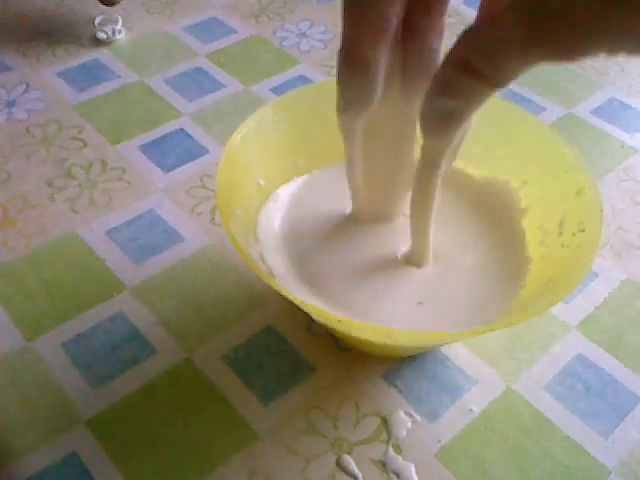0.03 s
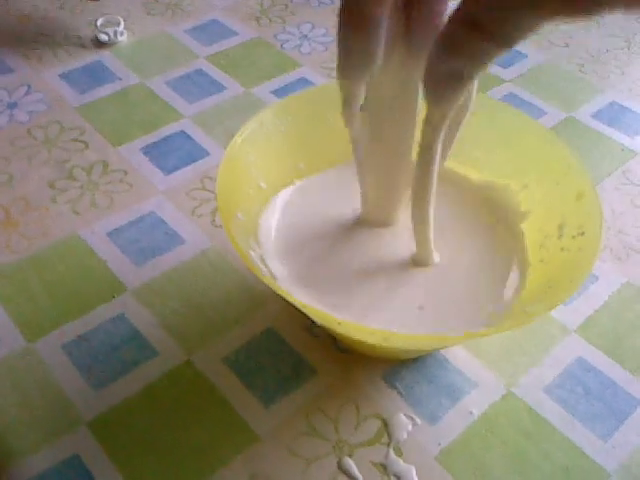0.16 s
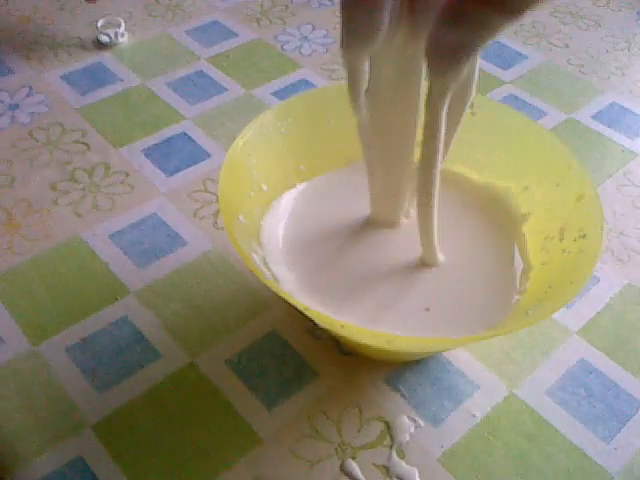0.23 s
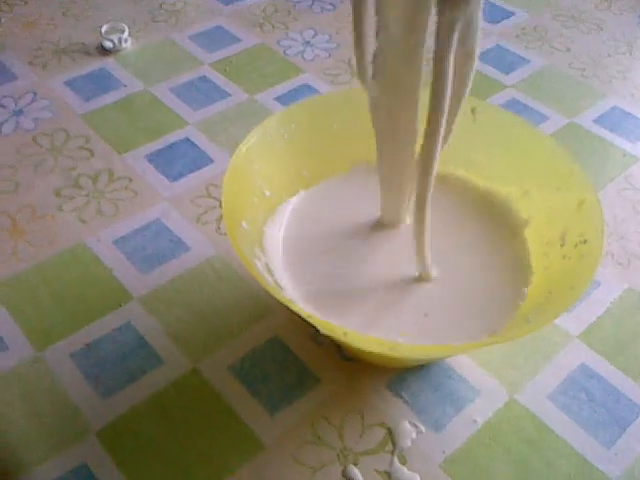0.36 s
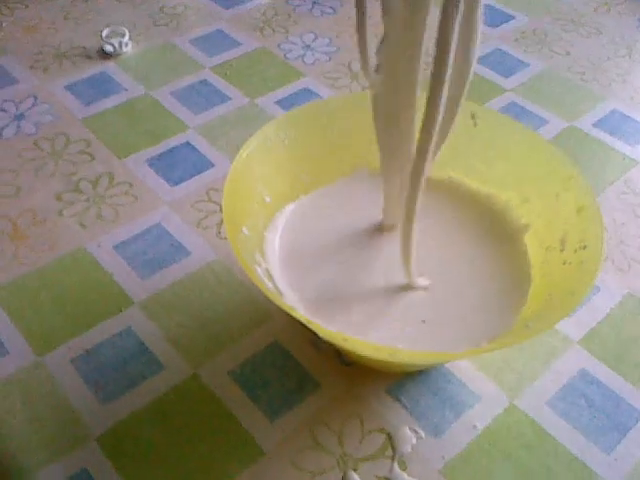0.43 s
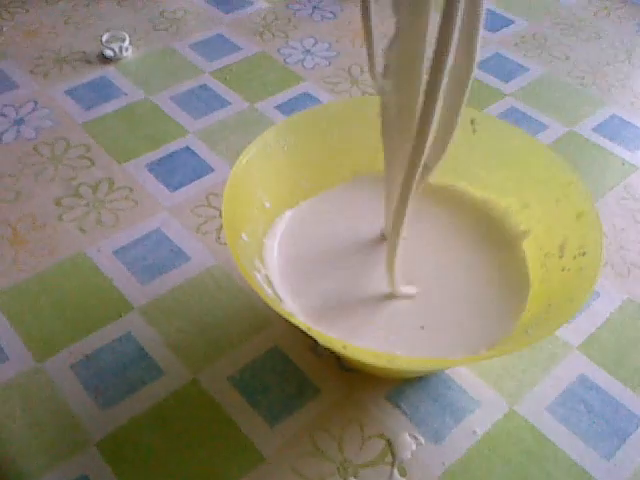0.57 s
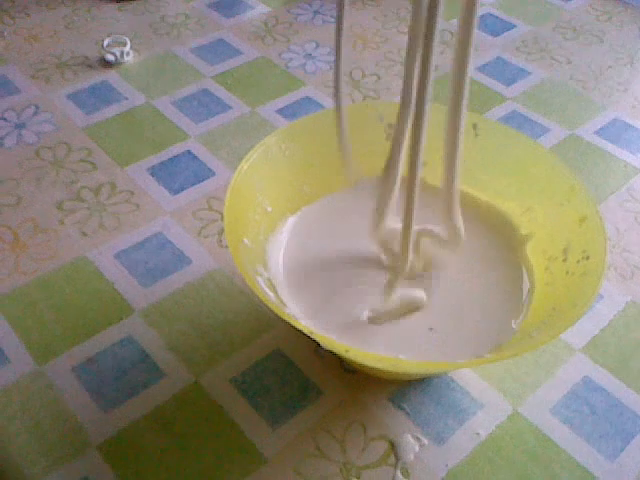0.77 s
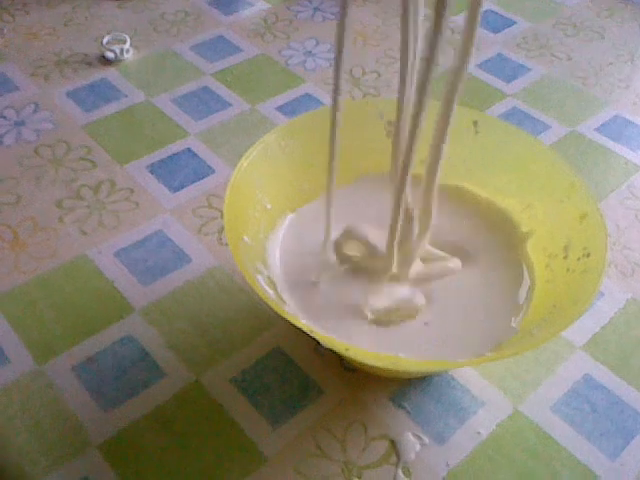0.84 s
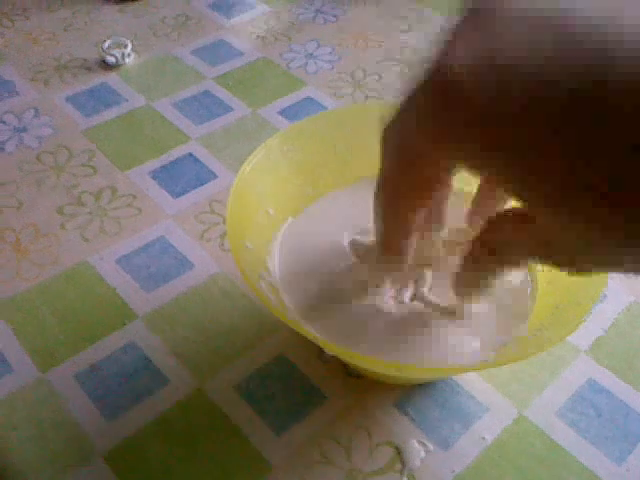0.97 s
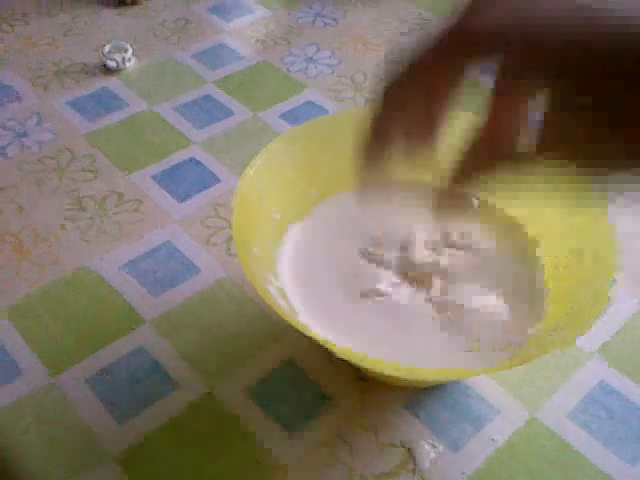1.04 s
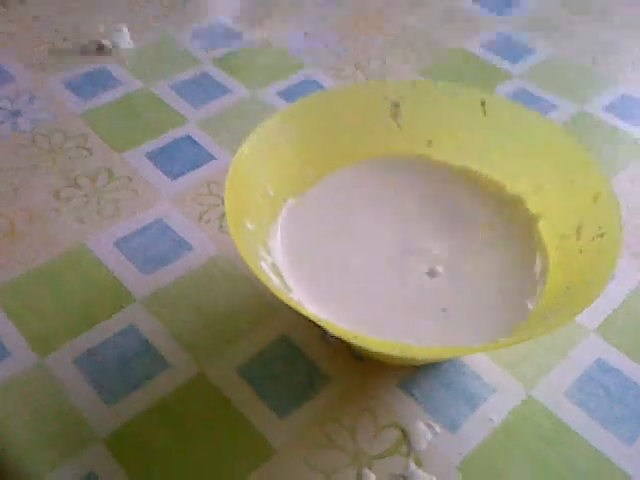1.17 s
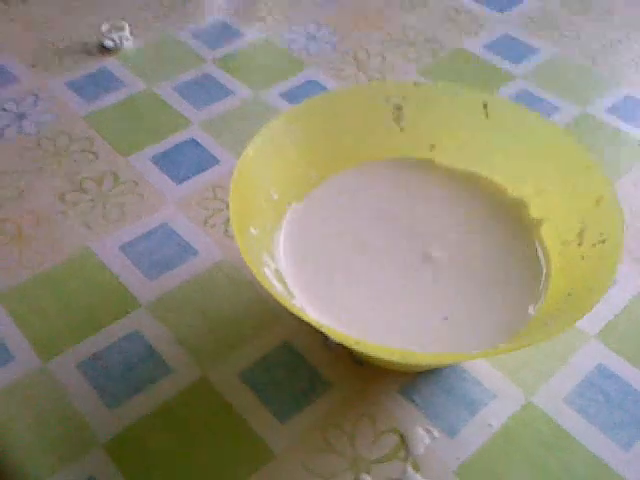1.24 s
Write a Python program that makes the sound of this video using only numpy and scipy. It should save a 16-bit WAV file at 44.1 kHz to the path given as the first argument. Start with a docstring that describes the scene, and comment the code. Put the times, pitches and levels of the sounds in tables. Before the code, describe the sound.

A single hard knock on a wooden table, very close to a cheap microphone that distorts on it; the top rings briefly, the small room answers, then low wavering hum, soft hiss and a few faint ticks.

```python
"""A hard knock on a wooden table in a small quiet room, close to a cheap camera microphone that clips on it.
The top rings briefly and the room answers, over a wavering motor hum, room rumble, hiss and faint ticks.
Hum is drifting sines; rumble and hiss are coloured noise; each tick is a decaying band of noise.
Each contact of the knock is a pressure pulse, a noise crack and decaying sine modes; the room is a noise tail.
"""
import sys
import numpy as np
from scipy import signal
from scipy.fft import rfft, irfft, next_fast_len
from scipy.io import wavfile
from scipy.ndimage import uniform_filter1d, map_coordinates

SR = 44100
rng = np.random.default_rng(int(sys.argv[2]) if len(sys.argv) > 2 else 0)


def wav_record(signal):
    """Record a signal, one row per channel, as 16-bit PCM in the file named by sys.argv[1]."""
    frames = np.transpose(np.atleast_2d(signal))
    bounded = np.clip(frames, -1, 1)
    # unit amplitude maps onto the largest positive 16-bit level
    quanta = np.round(bounded * 32767).astype(np.int16)
    wavfile.write(sys.argv[1], SR, quanta)


N = 57330
TIME_S = np.arange(N) / SR

# Motor hum lines. Each row: frequency in Hz, nominal level in dB rms.
HUM_LINES = [(48.4, -54.5), (96.9, -54), (150.7, -58), (193.8, -61.5), (274.5, -61), (366.1, -67),
             (484.5, -67.5), (532.9, -74)]
HUM_WAVER_DB, HUM_KNOTS_PER_S, HUM_DRIFT_RAD = 4, 8.99, 1.17

# Spectrum of rumble and hiss. Each row: frequency in Hz, relative density in dB per Hz.
HISS_SPECTRUM = [(15, -8), (30, -20.5), (100, -11.5), (220, -18), (280, -13), (330, -17), (560, -24),
                 (2000, -30.5), (9400, -37.5), (11000, -46)]
HISS_RMS_DB, HISS_PATCHY_DB = -47.5, 1.5

# Contacts of the knock: fingertips first, the blow, a rebound. Each row: start in seconds, level in dB.
KNOCK_CONTACTS = [(0.2252, -39), (0.2269, -20.5), (0.2285, 4), (0.2351, -10), (0.2389, -9), (0.2453, -15)]
PUSH_S, PUSH_DB = 0.00042, 7
PUSH_SWING = 1.54  # push lengths until the pressure turns negative
CRACK_DB, CRACK_T60_S, CRACK_CORNER_HZ = -15.5, 0.02, 5870  # level ahead of the low-pass

# Modes of the table top. Each row: frequency in Hz, relative level in dB, t60 in seconds.
TABLE_MODES = [(130.8, -22, 0.42), (173.9, -6.5, .3), (273.7, 3, 0.19), (297.6, 3, 0.14), (398.2, -2, 0.32),
               (470, -43, .25), (567.5, -1, 0.27), (643.8, 13, 0.077), (710, 5, 0.084), (786.2, 9.5, 0.095),
               (942, 2, 0.056), (1099.7, 9, 0.077), (1260, -21, 0.12), (1363, -27.5, .2)]
RING_DB, RING_RISE_S = -17.5, 0.0014

# Decay of the room. Each row: frequency in Hz, t60 in seconds.
ROOM_DECAY = [(100, 0.29), (260, 0.32), (700, 0.27), (1200, .3), (2200, 0.27), (4850, 0.32), (9000, 0.17)]
# Colour of the room. Each row: frequency in Hz, relative density in dB per Hz.
ROOM_SPECTRUM = [(35, -45), (70, -15), (150, -13), (280, -7), (570, -0.5), (1100, -5.5), (2000, -17.5),
                 (3400, -22.5), (4600, -34.5), (6500, -38), (10000, -37.5)]
ROOM_DB, ROOM_DELAY_S, ROOM_RISE_S = -15.5, 0.002, 0.001

# Faint ticks. Each row: start in seconds, level in dB ahead of the band filter, t60 in seconds, centre in Hz.
TICK_EVENTS = [(0.53, -35, 0.0086, 5500), (0.585, -33, 0.025, 1500), (0.639, -35, .012, 1400),
               (0.7667, -31, 0.0043, 5600), (1.0049, -36, 0.018, 5000), (1.176, -41, .04, 5000)]
TICK_WIDTH = 1.4  # bandwidth over centre, per filter pass

# Microphone and output stages; offset and clip levels are sample values.
OFFSET, MIC_CLIP, MIC_CLIP_HARDNESS, OUT_CLIP = 0.0153, 0.72, 10, 0.706
MIC_FALL_HZ, MIC_TOP_HZ, OUT_TOP_HZ = 9950, 10314, 15784


def amp(db):
    """dB to gain."""
    return 10 ** (np.asarray(db) / 20)


def unit(x):
    """Scaled to rms 1."""
    return x / np.sqrt(np.mean(x ** 2) + 1e-20)


def along(points, hz):
    """(Hz, value) points interpolated on a log frequency axis."""
    point_hz, value = np.transpose(points)
    return np.interp(np.log(hz + 1), np.log(point_hz + 1), value)


def wobble(knots_per_s):
    """A smooth random curve through normally distributed knots."""
    return map_coordinates(rng.standard_normal(64), [TIME_S * np.clip(knots_per_s, 0, 40)])


def filtered(x, response):
    """x times a response of frequency, zero-padded, cut to N samples."""
    m = next_fast_len(N + SR // 2)
    return irfft(rfft(x, m) * response(np.fft.rfftfreq(m, 1 / SR)), m)[..., :N]


def hum():
    """Motor lines: sines, each wavering in level and phase."""
    out = np.zeros(N)
    for hz, rms_db in HUM_LINES:
        level = np.sqrt(2) * amp(rms_db + HUM_WAVER_DB * wobble(HUM_KNOTS_PER_S))
        phase = 2 * np.pi * (hz * TIME_S + rng.random())
        out += level * np.sin(phase + HUM_DRIFT_RAD * wobble(HUM_KNOTS_PER_S))
    return out


def hiss():
    """Room rumble and microphone hiss: coloured noise, slightly patchy in time and frequency."""
    spectrum = signal.stft(rng.standard_normal(N), nperseg=512)[2]
    patches = uniform_filter1d(rng.standard_normal(spectrum.shape), size=6, axis=0)  # over frequency
    patches = uniform_filter1d(patches, size=8, axis=1)  # over time
    noise = signal.istft(spectrum * amp(HISS_PATCHY_DB * unit(patches)), nperseg=512)[1][:N]
    return amp(HISS_RMS_DB) * unit(filtered(noise, lambda f: amp(along(HISS_SPECTRUM, f))))


def push(t):
    """Pressure pulse of a contact: positive, then a decaying negative swing."""
    u = t / PUSH_S
    return amp(PUSH_DB) * u * (PUSH_SWING - u) * np.exp(-u)


def crack(t):
    """Surface crack of a contact: decaying noise through two one-pole low-passes."""
    noise = amp(CRACK_DB - 60 * t / CRACK_T60_S) * rng.standard_normal(N) * (t > 0)
    return filtered(noise, lambda f: (CRACK_CORNER_HZ / (CRACK_CORNER_HZ + 1j * f)) ** 2)


def table_ring(t):
    """Table-top modes: decaying sines with a short common rise."""
    modes = sum(amp(db - 60 * t / t60_s) * np.sin(2 * np.pi * hz * t) for hz, db, t60_s in TABLE_MODES)
    return amp(RING_DB) * modes * (1 - np.exp(-t / RING_RISE_S))


def knock():
    """Every contact pushes the air, cracks and rings the table top."""
    out = np.zeros(N)
    for start_s, db in KNOCK_CONTACTS:
        t = np.maximum(TIME_S - start_s, 0)
        out += amp(db) * (push(t) + crack(t) + table_ring(t))
    return out


def room():
    """The walls' answer to the contacts: dense echoes as noise, each frequency dying at its own speed."""
    hz, t, spectrum = signal.stft(rng.standard_normal(SR), SR, nperseg=256)
    decay = amp(-60 * t / along(ROOM_DECAY, hz)[:, None])
    tail = signal.istft(spectrum * decay, SR, nperseg=256)[1][:SR]
    tail = filtered(tail, lambda f: amp(along(ROOM_SPECTRUM, f)))
    tail = tail / np.sqrt(np.mean(tail[:SR // 50] ** 2))  # rms 1 over the first 20 ms
    tail = tail * (1 - np.exp(-TIME_S / ROOM_RISE_S))
    out = np.zeros(N)
    for start_s, db in KNOCK_CONTACTS:
        k = round((start_s + ROOM_DELAY_S) * SR)
        out[k:] += amp(db) * tail[:N - k]
    return amp(ROOM_DB) * out


def ticks():
    """Faint small ticks: decaying noise, each through two band-pass resonances of its own."""
    out = np.zeros(N)
    for start_s, db, t60_s, hz in TICK_EVENTS:
        decay = amp(db - 60 * np.maximum(TIME_S - start_s, 0) / t60_s) * (TIME_S >= start_s)

        def band(f):
            damping = 1j * f * TICK_WIDTH * hz
            return (damping / (hz * hz - f * f + damping)) ** 2

        out += filtered(decay * rng.standard_normal(N), band)
    return out


def scene():
    """All sources, one channel."""
    return (hum() + hiss() + knock() + room() + ticks())[None]


def record(dry):
    """The microphone stage saturates and is band-limited; the output stage cuts the overshoots flat."""
    x = dry + OFFSET
    x = x / (1 + np.abs(x / MIC_CLIP) ** MIC_CLIP_HARDNESS) ** (1 / MIC_CLIP_HARDNESS)
    # the offset bypasses both filters
    x = filtered(x - OFFSET, lambda f: (f < MIC_TOP_HZ) / (1 + (f / MIC_FALL_HZ) ** 40)) + OFFSET
    x = np.clip(x, -OUT_CLIP, OUT_CLIP)
    return filtered(x - OFFSET, lambda f: f < OUT_TOP_HZ) + OFFSET


dry = scene()
out = record(dry)
wav_record(out)
```